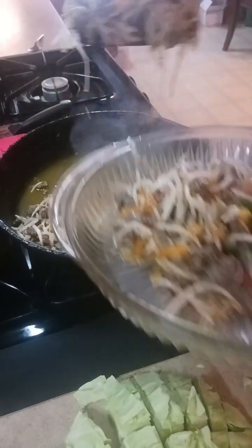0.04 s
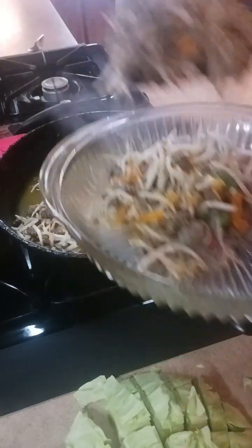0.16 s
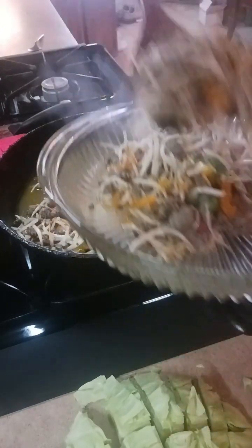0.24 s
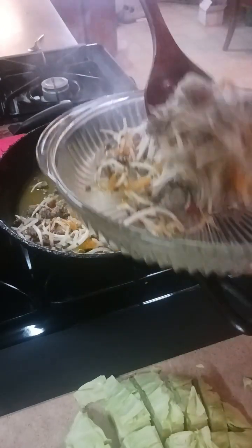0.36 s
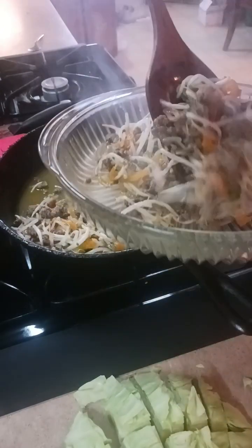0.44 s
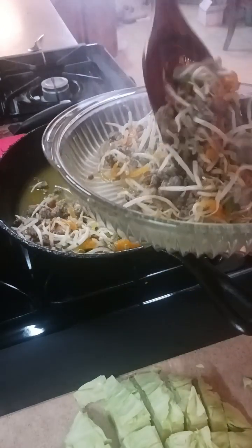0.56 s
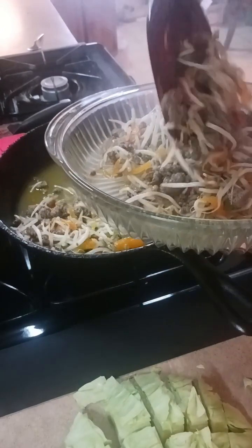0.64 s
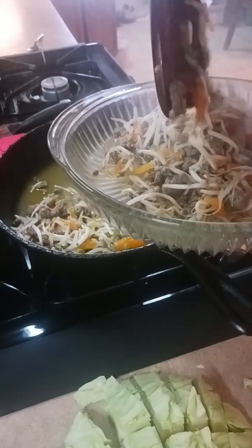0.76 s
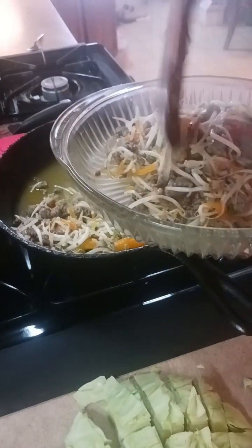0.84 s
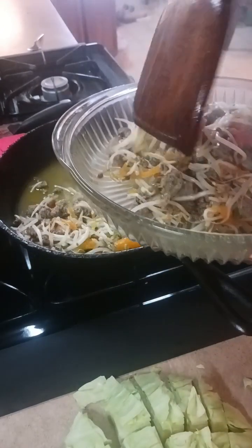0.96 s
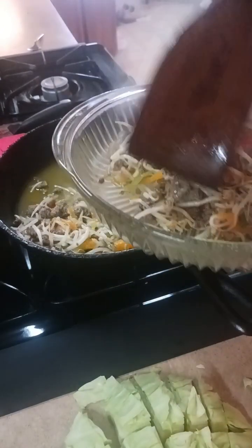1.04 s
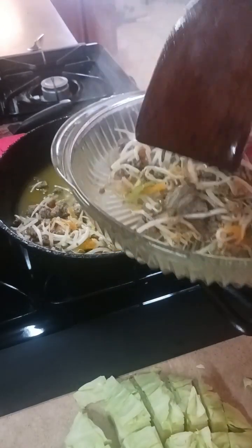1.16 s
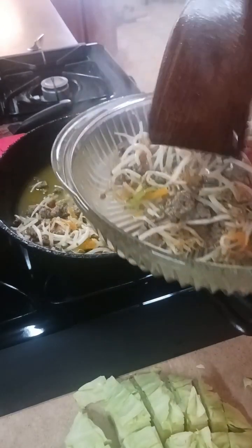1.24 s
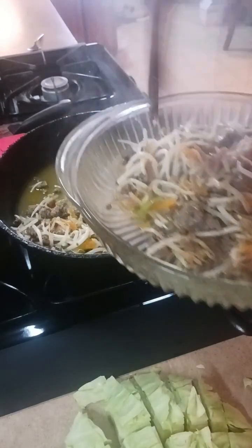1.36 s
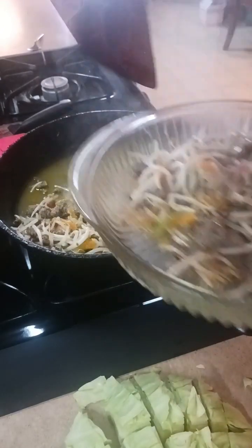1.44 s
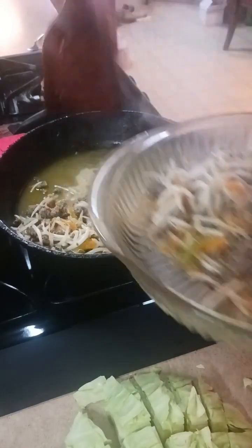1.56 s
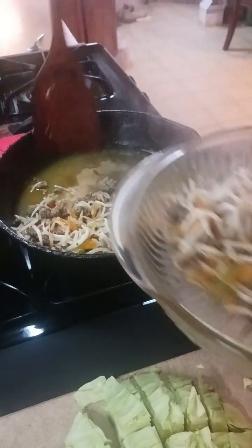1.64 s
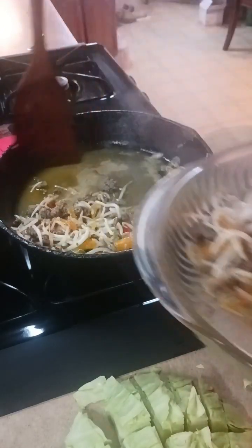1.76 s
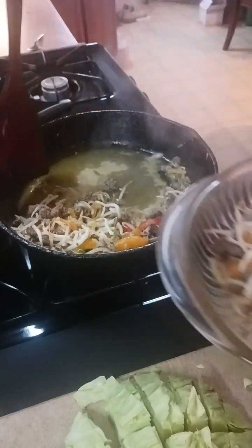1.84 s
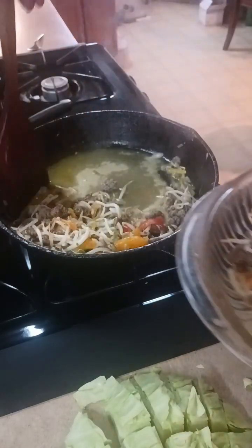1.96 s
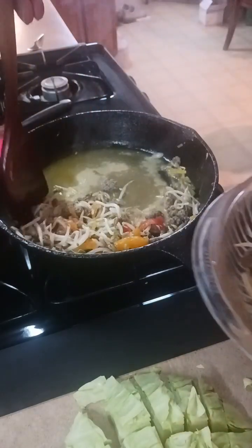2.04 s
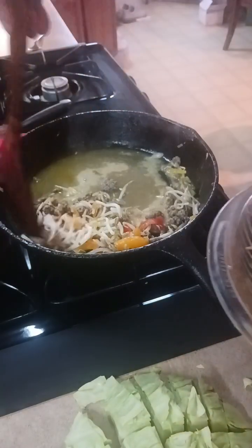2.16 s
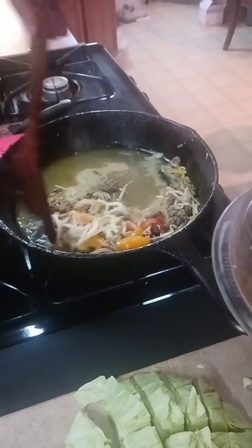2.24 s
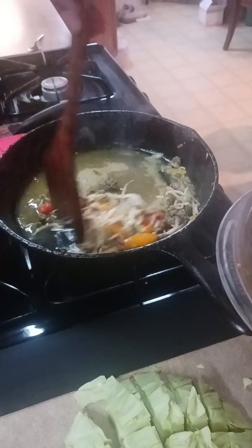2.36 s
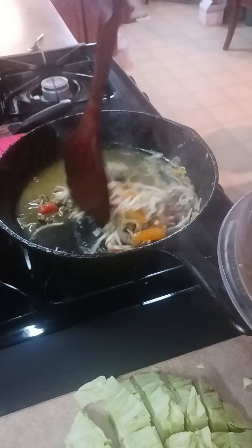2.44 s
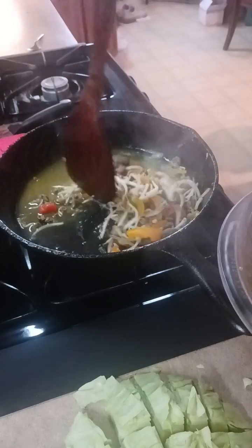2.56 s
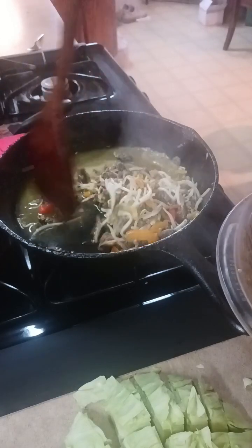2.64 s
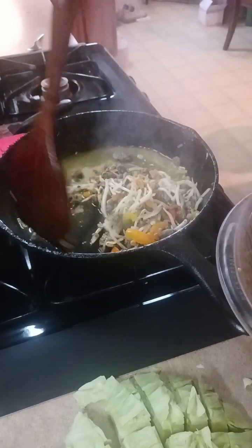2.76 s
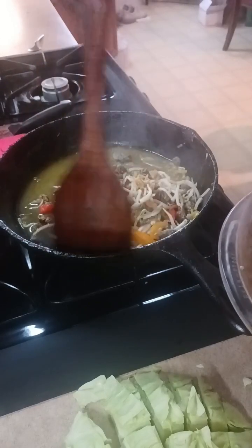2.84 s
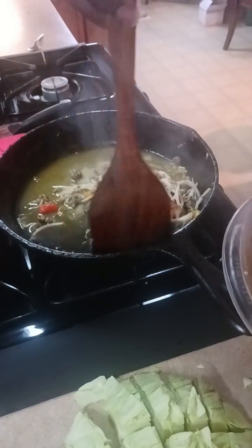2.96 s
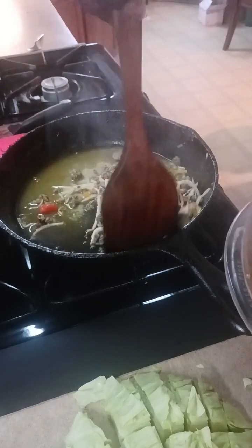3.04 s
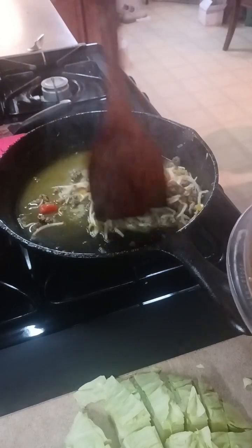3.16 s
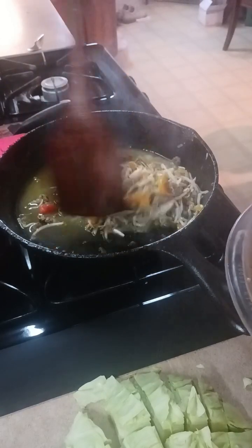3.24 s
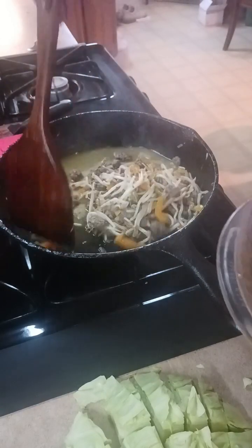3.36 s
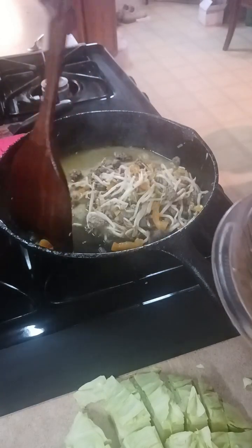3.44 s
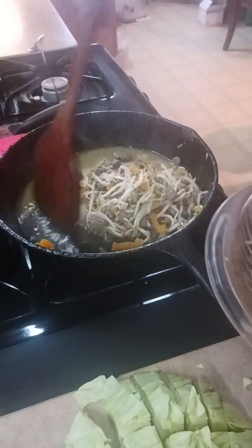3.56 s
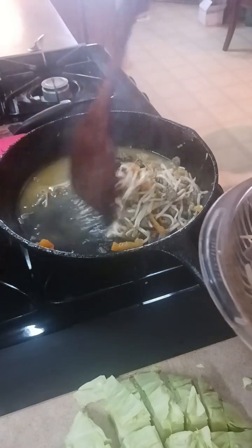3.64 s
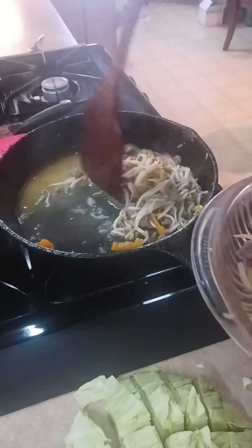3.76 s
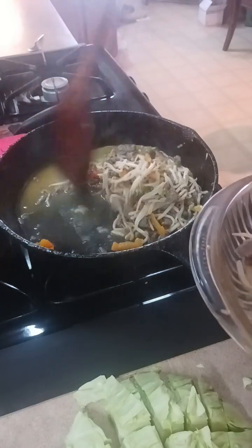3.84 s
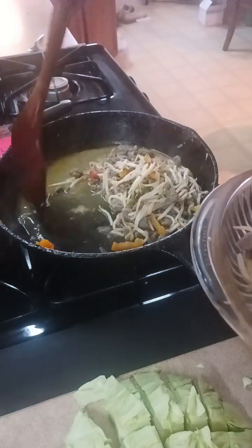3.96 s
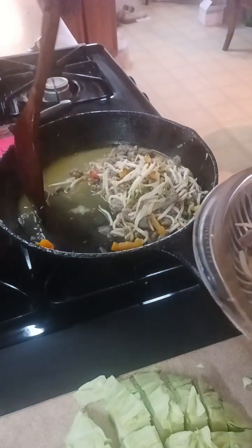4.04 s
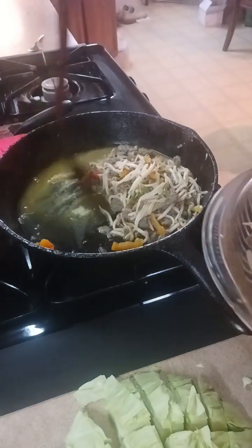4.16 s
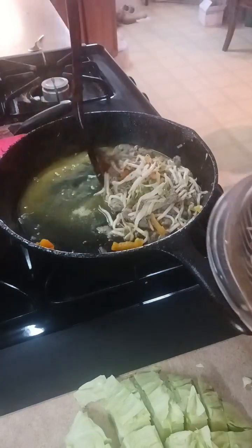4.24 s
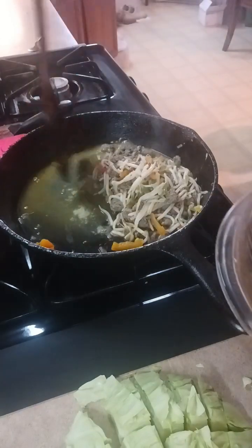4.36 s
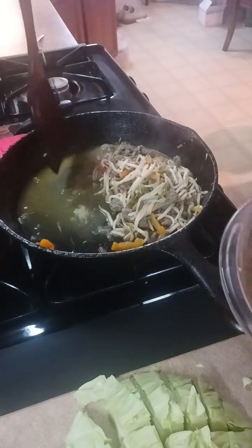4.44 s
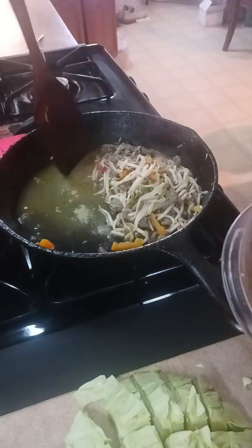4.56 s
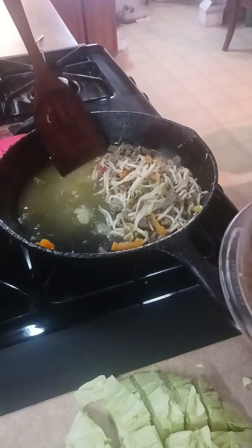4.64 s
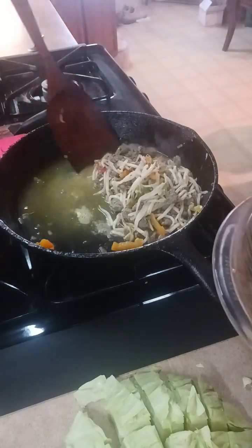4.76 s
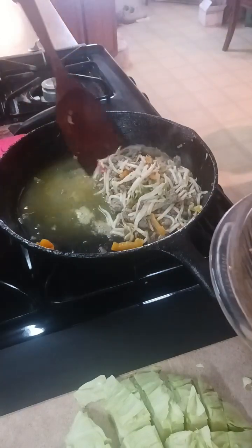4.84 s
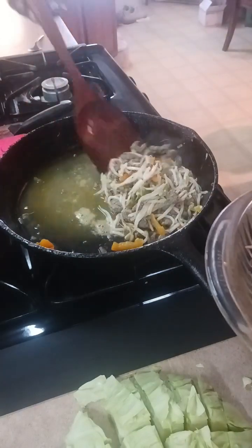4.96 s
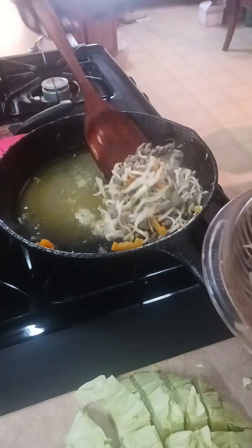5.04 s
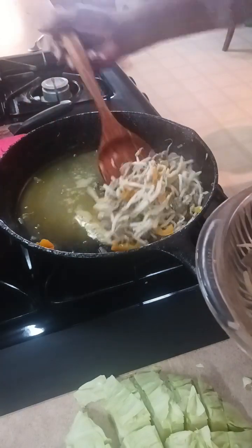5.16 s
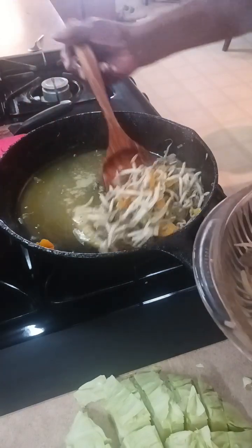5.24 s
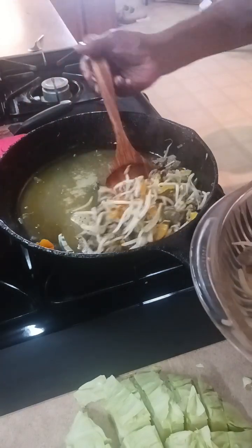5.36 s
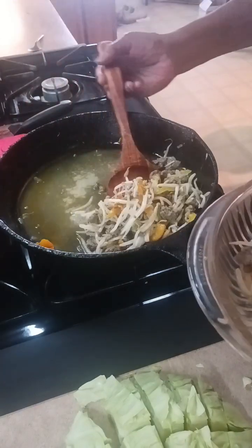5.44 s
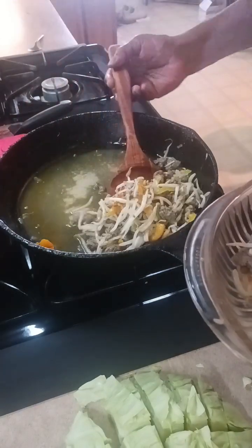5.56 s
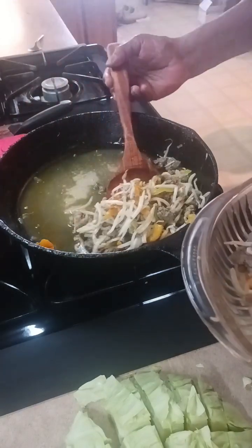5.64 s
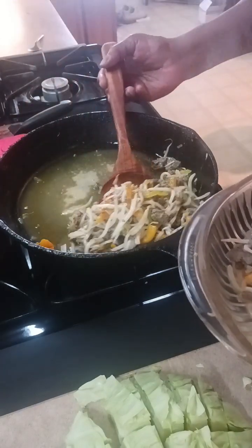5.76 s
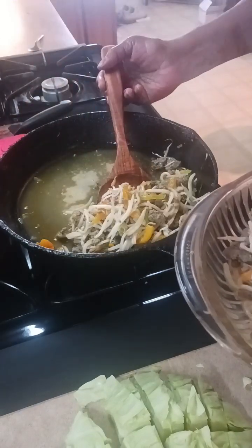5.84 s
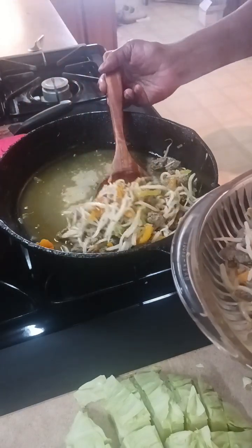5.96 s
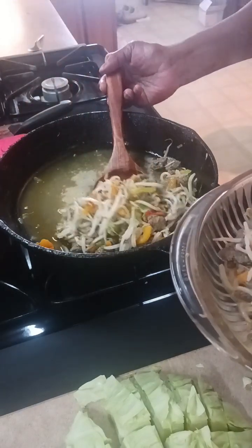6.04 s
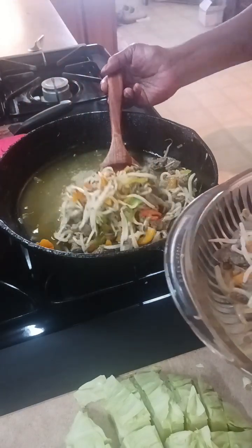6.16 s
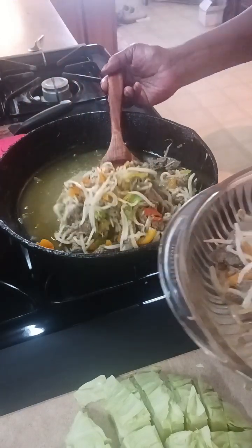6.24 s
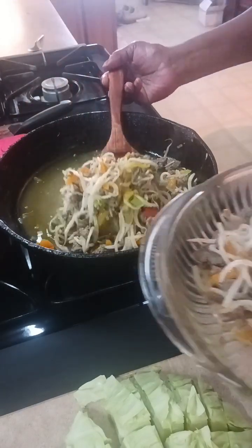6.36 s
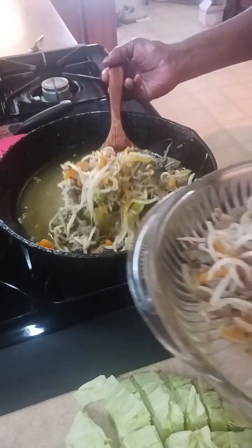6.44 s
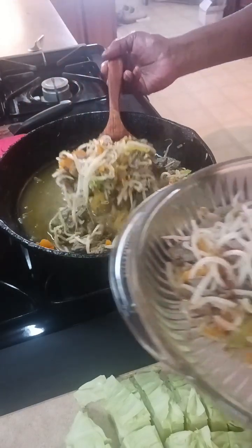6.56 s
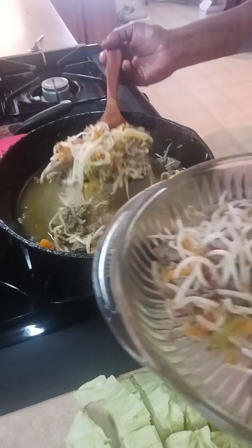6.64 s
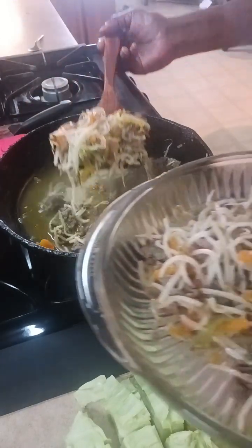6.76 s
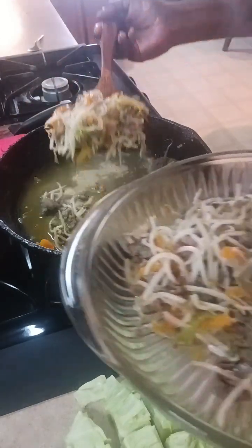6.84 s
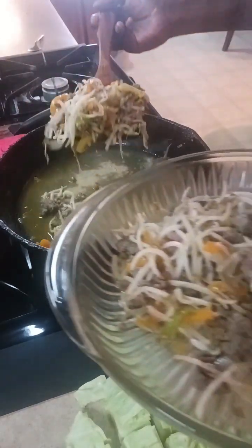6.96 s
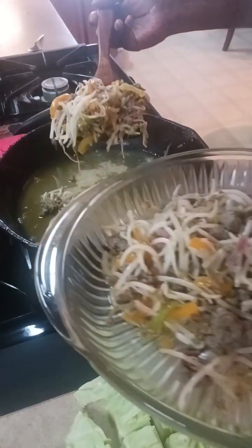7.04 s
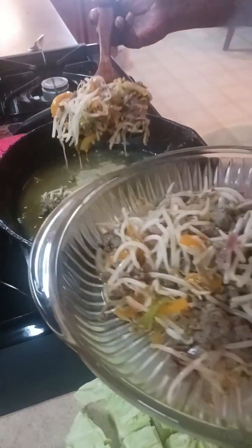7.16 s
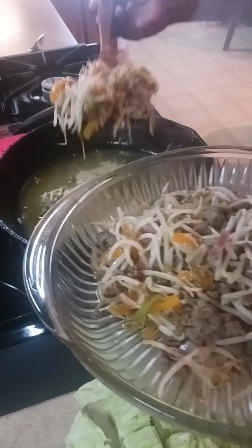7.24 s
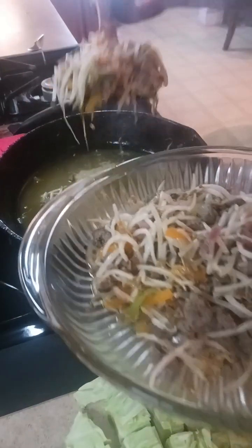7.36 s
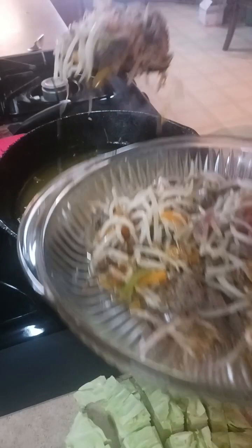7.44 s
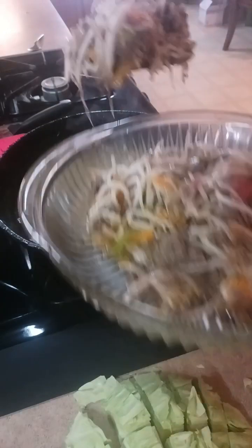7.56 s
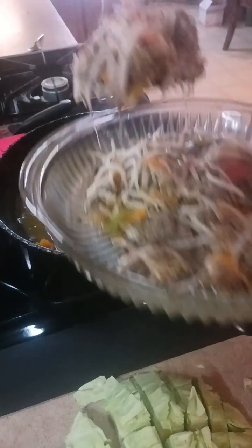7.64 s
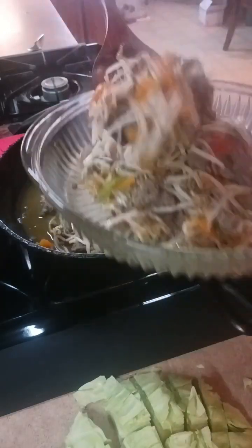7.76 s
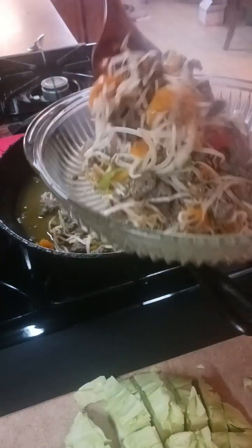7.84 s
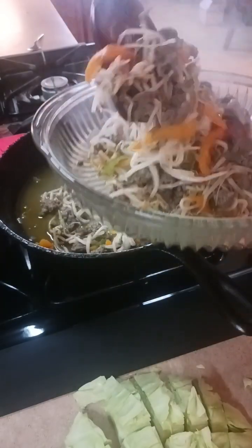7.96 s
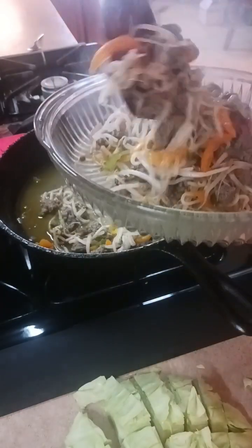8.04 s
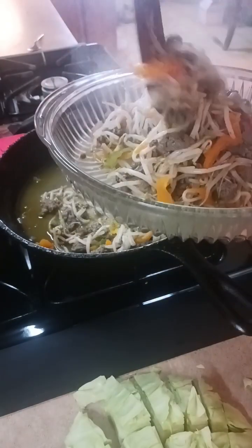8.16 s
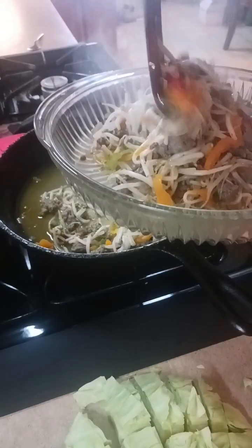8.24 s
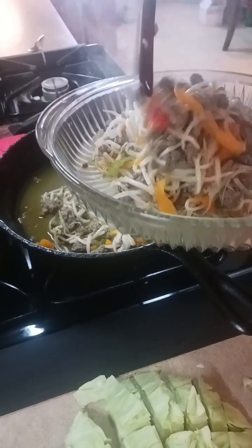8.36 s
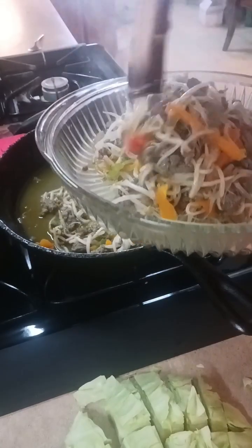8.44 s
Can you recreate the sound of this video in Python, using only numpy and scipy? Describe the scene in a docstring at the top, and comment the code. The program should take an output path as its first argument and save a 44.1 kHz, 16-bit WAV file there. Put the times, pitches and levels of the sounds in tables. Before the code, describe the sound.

Close stereo pickup in a home kitchen. A soft, steady sizzle and low rumble run throughout. After nearly two seconds a wooden spoon taps a heavy iron pan, then cracks it harder, scraping through wet vegetables. More bright knocks and short rasping strokes follow, the strongest a quick double midway. Tiny wet squeaks trail off, leaving faint sizzle and one barely audible tick late on.

```python
"""A wooden spoon knocks on and scrapes along a cast-iron pan of wet vegetables in a home kitchen.
Knocks and scrapes drive decaying modes of spoon, damped pan and iron; knocks add a crash of noise.
Wet bubbles and squeaks of the spoon on iron are short gliding tones; a low rumble and a faint smooth
sizzle, both filtered noise, lie below. Two microphone ports a few centimetres apart pick it up."""
import sys
import numpy as np
from scipy import signal
from scipy.fft import rfft, irfft, next_fast_len
from scipy.io import wavfile
from scipy.ndimage import uniform_filter1d

SR = 44100
rng = np.random.default_rng(int(sys.argv[2]) if len(sys.argv) > 2 else 0)


def transcribe(signal):
    """Save signal, clipped to [-1, 1], as a 16-bit WAV file at the path in sys.argv[1]."""
    frames = np.atleast_2d(signal).T
    limited = np.clip(frames, -1, 1)
    pcm = np.round(limited * 32767).astype(np.int16)
    wavfile.write(sys.argv[1], SR, pcm)


N = 374409

# Scraping strokes. Each row: start in s, rise in s, fall in s, top level in dB, starting colour in Hz,
# colour width in octaves, grit in dB.
STROKES = [(1.867, .012, 0.32, -44, 1200, 1.8, -18), (2.1, 0.059, .03, -55, 1700, 0.41, -4),
           (2.19, 0.018, 0.31, -41, 1690, 2, -13), (2.371, 0.038, 0.15, -43, 900, 0.66, -9),
           (2.804, 0.01, 0.22, -45, 1550, 2.9, 4), (2.89, 0.031, 0.21, -47.5, 1590, 0.93, -1),
           (3.348, 0.019, 0.15, -29, 2100, 1.46, -1), (3.41, 0.046, 0.062, -34, 1250, 1.5, -11),
           (3.501, 0.077, 0.21, -41.5, 980, .55, -5.5), (4.055, 0.013, 0.066, -34.5, 1170, 0.75, -33),
           (4.12, .066, .14, -35, 1050, 0.47, -13.5), (4.478, .02, 0.19, -34, 2200, 2, -10),
           (4.594, .012, 0.14, -28.5, 1670, 0.88, -31), (4.639, 0.029, 0.049, -31, 1100, 0.66, -19),
           (4.7, 0.093, .33, -44.5, 810, 0.84, -5), (4.88, 0.22, 0.35, -50, 1900, 0.58, 3.5)]
# Short modes of spoon and food-damped pan. Each row: frequency in Hz, level in dB, t60 in s before damping.
SHORT_MODES = [(310, -3, .25), (450, -3, .2), (600, -6, .08), (700, -5, .08), (800, -4, .09),
               (990, -4, .07), (1280, -5, .07), (1440, -3, .08), (1620, -.5, .14), (1850, -3, .13),
               (1955, -.5, .1), (2170, -.4, .075), (2620, -2.5, .045), (2920, -3.5, .045), (3340, -3, .06),
               (3600, -4, .07), (3990, -2.5, .07), (4150, -.5, .06), (4550, -6, .04), (5780, -7, .04),
               (6820, -18, .025), (8900, -22, .015)]
# Long modes of the iron. Each row: frequency in Hz, level in dB, t60 in s.
IRON_MODES = [(455, -13, .9), (721, -7, 1.2), (808, -20, .5), (1111, -2, .5), (1626, -17, .5),
              (1852, -18, .4), (2170, -1, .26), (2302, -15, .5), (2458, -14, .7), (2966, -24, .4),
              (3338, -23, .4), (3835, -18, .4), (4140, -14, .25), (4264, -19, .35), (4495, -14, .2),
              (5778, -14, .2)]


def from_db(db):
    """Decibels to gain."""
    return 10 ** (np.asarray(db) / 20)


def rms_one(x):
    """Scale to unit rms."""
    return x / np.sqrt(np.mean(x ** 2) + 1e-20)


def in_time(rows):
    """Columns of a curve, one value a sample."""
    s, *columns = np.transpose(rows)
    return [np.interp(np.arange(N) / SR, s, c) for c in columns]


def at_hz(points, hz):
    """Read a table on a log-frequency axis."""
    table_hz, values = np.array(points).T
    return np.interp(np.log(hz), np.log(table_hz), values)


def band_filter(order, low_hz, high_hz):
    """Butterworth band-pass sections."""
    return signal.butter(order, [low_hz, high_hz], "band", fs=SR, output="sos")


def drift(rate_hz):
    """Slow random wander with rms 1, drawn every 40 samples and interpolated."""
    r = np.exp(-80 * np.pi * rate_hz / SR)
    white = rng.standard_normal(N // 40 + 2002)
    slow = signal.lfilter([1], [1, -2 * r, r * r], white)[2000:]   # skips the filter's start
    return np.interp(np.arange(N) / 40, np.arange(len(slow)), rms_one(slow))


def ring(force, hz, t60_s):
    """Decaying mode: a unit click starts a sine of initial amplitude 1."""
    r = from_db(-60 / (t60_s * SR))
    w = 2 * np.pi * hz / SR
    return signal.lfilter([0, np.sin(w)], [1, -2 * r * np.cos(w), r * r], force + 1e-18)


def stereo_pair(mid, side, hz):
    """Mix two noises to the left-right likeness and level difference at this frequency."""
    # Each row: frequency in Hz, left-right correlation.
    likeness = [(60, 0.94), (130, 0.92), (290, 0.65), (640, 0.52), (1410, -0.069), (3100, -0.1),
                (6820, -0.084), (15000, 0.072)]
    # Each row: frequency in Hz, left minus right in dB.
    leaning = [(60, 2), (110, -6), (200, 10.5), (380, 6.5), (700, -0.5), (1290, 5.5), (2380, 2.5),
               (4400, 2.5), (8120, -3), (15000, 4.5)]
    alike = np.clip(at_hz(likeness, hz), -1, 1)
    half_lean_db = at_hz(leaning, hz) / 2
    pair = np.sqrt(1 + alike) * mid + np.sqrt(1 - alike) * side * [[1], [-1]]
    return pair * from_db([[half_lean_db], [-half_lean_db]])


def rumble():
    """Low noise that rings in a few resonances of room and stove, each wandering in level."""
    # Each row: frequency in Hz, width in Hz, relative level in dB.
    resonances = [(58.5, 6.9, 1), (110.9, 11.9, 0.5), (172, 10, -28), (275, 8, -18.5), (324, 10, -28),
                  (433, 25, -12)]
    out = 0
    for hz, width_hz, level_db in resonances:
        r = np.exp(-np.pi * width_hz / SR)
        poles = [1, -2 * r * np.cos(2 * np.pi * hz / SR), r * r]
        white = rng.standard_normal((2, N + 9000))
        mid, side = signal.lfilter([1, 0, -1], poles, white)[:, 9000:]
        gain = from_db(level_db + 1.4 * drift(11.0))
        out = out + gain * stereo_pair(rms_one(mid), rms_one(side), hz)
    return rms_one(signal.sosfilt(band_filter(2, 38, 520), out))


def sizzle(spectrum, patchy_db):
    """Bursts too dense to tell apart, made as noise in quarter-octave bands that flicker a little."""
    out, together = 0, drift(27.0)
    first_hz, last_hz = spectrum[0][0], spectrum[-1][0]
    edges_hz = first_hz * 2 ** np.arange(0, np.log2(last_hz / first_hz) + .1, .25)
    white = rng.standard_normal((2, 2, N))   # neighbouring bands use different noise
    for k, (low_hz, high_hz) in enumerate(zip(edges_hz, np.minimum(edges_hz[1:], .45 * SR))):
        mid, side = signal.sosfilt(band_filter(2, low_hz, high_hz), white[k % 2])
        hz = np.sqrt(low_hz * high_hz)
        flicker_db = patchy_db * (0.21 * together + drift(9.3))
        out = out + from_db(at_hz(spectrum, hz) + flicker_db) * stereo_pair(mid, side, hz)
    return rms_one(out)


def hump(hz, centre_hz, octaves):
    """Bell curve on a log-frequency axis."""
    return np.exp(-.5 * (np.log2(hz / centre_hz) / np.maximum(octaves, .12)) ** 2)


def colour(hz, centre_hz, octaves, edge_db, edge_hz, thump_db, ping_db):
    """How strongly a contact drives hz: humps for body, hard edge, low thump and top ping, plus a floor."""
    body = hump(hz, centre_hz, octaves)
    edge = from_db(edge_db) * hump(hz, edge_hz, .2)
    thump = from_db(thump_db) * hump(hz, 410, 0.4)
    ping = from_db(ping_db) * hump(hz, 5850, .1)
    return body + edge + thump + ping + 0.0033


def crash(contact, treble_db, decay_share):
    """Countless high modes merge into noise, separate in each port, that dies band by band."""
    # Each row: band centre in Hz, level in dB, t60 in s before decay_share.
    bands = [(500, -6, .3), (1000, -3, .3), (2000, -.3, .28), (4000, -.3, .26), (8000, -3, .24),
             (13000, -9, .16)]
    t = np.arange(int(.3 * SR)) / SR
    hz = np.maximum(np.fft.rfftfreq(len(t), 1 / SR), 1)
    tint = colour(hz, *contact) ** .8 + from_db(treble_db) * hump(hz, 8000, .8)
    white = rfft(rng.standard_normal((2, len(t)))) * tint
    noise = 0
    for band_hz, db, t60_s in bands:
        decay = from_db(db - 60 * t / (t60_s * decay_share))
        noise = noise + decay * irfft(white * hump(hz, band_hz, 0.63), len(t))
    return (1 - np.exp(-t / 0.00018)) * noise


def knocks():
    """A brief push drives short modes by its colour and the iron's long ring; a crash of noise joins."""
    # Each row: start in s, level in dB, strike colour in Hz, colour width in octaves, hard edge in dB,
    # edge in Hz, low thump in dB, top ping in dB, iron ring in dB, factor on short-mode t60,
    # left minus right in dB.
    hits = [(1.858, -29.5, 1240, 0.47, -1, 4160, 2, -35, -23, 0.53, -2),
            (2.181, -9.5, 2365, 0.15, -9.5, 4360, -31.5, -35, -24.5, 0.3, -2),
            (2.803, -29, 1530, 0.14, 2, 3040, -7, -30, -35, 0.42, 0),
            (2.965, -37.5, 1550, .27, 16, 2870, -23, -17, -32, 0.5, -2),
            (3.3404, -9.5, 2200, 0.6, 10.5, 4170, -20, -6, -13.5, 0.42, -0.5),
            (3.449, -27, 1130, 0.2, -16, 2900, -13.5, -33, -15, .8, -1),
            (4.024, -23.5, 2210, 0.17, -8, 4160, -24.5, -38, -27.5, 0.69, 2),
            (4.047, -16.5, 1270, 0.45, -8.5, 3300, -20.5, -40, -30.5, 0.55, -4.5),
            (4.4685, -10, 2310, 0.51, 6, 4000, -18, 6.5, -14, 0.34, 5),
            (4.5869, -5.5, 1820, 0.14, -2.5, 3410, -30, -10.5, -32.5, 0.61, 3),
            (4.775, -41, 700, 0.41, 2, 3200, -19, -30, -22, .68, -9),
            (6.18, -51.5, 715, .2, 11, 4200, 8, -29, -9, .99, 7),
            (7.5401, -32.5, 3200, 0.26, 4, 4700, -32, -5, -25, 0.28, -3)]
    contact_ms_at_0_db, shortening_db_per_edge_db = .05, .3   # a harder edge touches more briefly
    crash_db, treble_under_edge_db, crash_decay_share = -13, -13, 0.32
    out, t = np.zeros((2, N)), np.arange(int(.7 * SR)) / SR
    radiate = signal.butter(2, 290, "high", fs=SR, output="sos")   # a small body pushes little air in the bass
    lucks = from_db(rng.normal(0, 1.5, (len(hits), 40)))   # random gain per mode
    for row, luck in zip(hits, lucks):
        s, level_db, *contact, iron_db, damping, pan_db = row
        edge_db = contact[2]
        contact_ms = contact_ms_at_0_db * from_db(-shortening_db_per_edge_db * edge_db)
        push = np.exp(-.5 * (4000 * t / max(contact_ms, .03) - 2.5) ** 2)
        push /= push.sum()
        short_push = push[:int(.3 * SR)]

        thud = 0
        for k, (hz, db, t60_s) in enumerate(SHORT_MODES):
            gain = (-1) ** (k // 3) * from_db(db) * colour(hz, *contact) * luck[k]
            thud = thud + gain * ring(short_push, hz, t60_s * max(damping, .1))
        thud = signal.sosfilt(radiate, thud)
        thud = thud / np.sqrt(5 * np.mean(thud[:250] ** 2))   # level set by the first 250 samples

        iron = 0
        for k, (hz, db, t60_s) in enumerate(IRON_MODES):
            gain = (-1) ** (k // 2) * from_db(db) * colour(hz, *contact) ** .5 * luck[-1 - k]
            iron = iron + gain * ring(push, hz, t60_s)

        sound = from_db(iron_db) * iron * np.ones((2, 1))
        burst = crash(contact, edge_db + treble_under_edge_db, crash_decay_share)
        sound[:, :len(short_push)] += thud + from_db(crash_db) * burst
        at = round(s * SR)
        panned = sound[:, :N - at] * from_db([[pan_db / 2], [-pan_db / 2]])
        out[:, at:at + len(t)] += from_db(level_db) * panned
    return out


def stroke_db(start_s, rise_s, fall_s, top_db):
    """Sample indices of one stroke and its level: swell, then fade, linear in dB."""
    swell_db, fade_db = 12, 26.5
    at = np.arange(round(start_s * SR), round((start_s + rise_s + fall_s) * SR))
    levels_db = [top_db - swell_db, top_db, top_db - fade_db]
    return at, np.interp(at / SR - start_s, [0, rise_s, rise_s + fall_s], levels_db)


def scraping(slips_per_s, iron_db, apart):
    """The blade stutters over rough iron: dense uneven slips drive the modes, partly unlike at the ports."""
    sag_octaves_per_s = .9   # the colour darkens as the blade slows
    out = np.zeros((2, N))
    modes = [(hz, db, 0.39 * t60_s) for hz, db, t60_s in SHORT_MODES]
    modes += [(hz, db + iron_db, t60_s) for hz, db, t60_s in IRON_MODES]
    for *shape, start_hz, octaves, grit_db in STROKES:
        at, level_db = stroke_db(*shape)
        centre_hz = start_hz * 2 ** (-sag_octaves_per_s * (at - at[0]) / SR)
        slip_db = 1.8 * np.minimum(rng.exponential(1, len(at)), 4)
        slips = (rng.random(len(at)) < slips_per_s / SR) * from_db(slip_db)
        common = rng.standard_normal(len(at))
        force = slips * (common + apart * rng.standard_normal((2, len(at))))
        sound = 0
        for k, (hz, db, t60_s) in enumerate(modes):
            drive = from_db(db) * colour(hz, centre_hz, octaves, grit_db, 2980, -22.5, -33.5)
            sound = sound + (-1) ** k * ring(force * drive, hz, t60_s)
        rasp = signal.sosfilt(band_filter(2, 4500, 12000), force)   # the slips heard directly
        sound = sound + from_db(grit_db + 14) * rasp
        # flattened, so that the stroke's shape sets the level
        loudness = np.sqrt(uniform_filter1d((sound ** 2).mean(axis=0), size=3000) + 1e-12)
        out[:, at] += sound / loudness * from_db(level_db) * signal.windows.tukey(len(at), .1)
    return out


def stirring():
    """Stirred food sizzles harder and the pan shakes while the blade moves: a smoothed control signal."""
    level_share, smooth_s = 0.53, 0.037   # share of the stroke's level in dB
    moved = np.zeros(N)
    for row in STROKES:
        at, level_db = stroke_db(*row[:4])
        moved[at] = np.maximum(moved[at], from_db(level_share * level_db))
    return np.maximum(uniform_filter1d(moved, size=int(smooth_s * SR)), 0)


def chirps():
    """Short gliding tones with one overtone: wet bubbles and squeaks of the spoon on iron."""
    # Each row: start in s, level in dB, start in Hz, end in Hz, length in s, overtone in dB,
    # left minus right in dB.
    glides = [(4.663, -32.5, 940, 1085, 0.019, -27, -14), (4.728, -33.5, 923, 1035, 0.012, -32.5, -5),
              (4.974, -50, 1710, 1850, .018, -32, 3), (5.002, -42.5, 2060, 2230, 0.023, -18, -3),
              (5.027, -48, 1217, 1490, 0.071, -19, 6), (5.082, -56, 1496, 1720, 0.072, 8, 2),
              (5.09, -52, 2120, 2300, .04, -5, 6), (5.157, -57, 1364, 1173, 0.193, -29, 0)]
    out = np.zeros((2, N))
    for s, level_db, start_hz, end_hz, length_s, overtone_db, pan_db in glides:
        u = np.linspace(0, 1, int(length_s * SR))
        phase = 2 * np.pi * np.cumsum(start_hz + (end_hz - start_hz) * u) / SR
        shape = np.sin(np.pi * u ** 0.6) ** 1.3
        wave = np.sin(phase) + from_db(overtone_db) * np.sin(2 * phase)
        tone = from_db(level_db) * shape * wave
        at = round(s * SR)
        out[:, at:at + len(u)] += tone * from_db([[pan_db / 2], [-pan_db / 2]])
    return out


def ports(x):
    """The two ports hear the pan with level and phase differing by frequency, and own near echoes."""
    # Each row: frequency in Hz, left minus right in dB.
    pan_leaning = [(60, -1.0), (110, -4.0), (200, -3.5), (380, 1.0), (700, -6.5), (1290, -0.5), (2380, 2.5),
                   (4400, 5.0), (8120, -1.0), (15000, 1.5)]
    # Each row: frequency in Hz, phase by which left leads in radians.
    pan_phase = [(100, .05), (600, .6), (1100, 2.2), (1700, 1.4), (2500, 1.9), (4200, 2.7), (8000, 5.5),
                 (16000, 11.)]
    # Echoes off the stove, one list for the left port, one for the right. Each row: delay in s, level in dB.
    stove_echoes = [
        [(.0021, -34), (.0074, -34.5)],
        [(.0033, -6), (.0078, -14.5)],
    ]
    size = next_fast_len(N + 4096)
    hz = np.maximum(np.fft.rfftfreq(size, 1 / SR), 1)
    lean = from_db(at_hz(pan_leaning, hz) / 2)
    right_lag = np.exp(-1j * at_hz(pan_phase, hz))
    paths = []
    for port_echoes in stove_echoes:
        echoes = sum(from_db(db) * np.exp(-2j * np.pi * hz * s) for s, db in port_echoes)
        paths.append(1 + echoes)
    return irfft(rfft(x, size) * paths * [lean, right_lag / lean], size)[:, :N]


def kitchen(x):
    """Room reverberation: eight feedback delays a side, duller on every round."""
    bass_t60_s, wall_cut_hz = 0.49, 2400
    size = next_fast_len(N + SR)
    w = 2 * np.pi * np.fft.rfftfreq(size)
    dull = 1 / (1 + 1j * w * SR / (2 * np.pi * wall_cut_hz))
    response = np.zeros((2, len(w)), complex)
    for k, lag in enumerate(np.geomspace(.006, .037, 16) * SR):
        loop = from_db(-60 * lag / SR / bass_t60_s) * dull * np.exp(-1j * w * round(lag))
        response[k % 2] += loop / (1 - loop) * (-1) ** (k // 2)
    return irfft(response * rfft(x, size), size)[:, :N]


def scene():
    """Pan sounds through ports and room, over the background."""
    # Background between the strokes. Each row: time in s, rumble in dB, upper sizzle in dB.
    background_levels = [(0.0, -49, -59), (0.16, -48, -58.5), (1.32, -52.5, -58), (2.22, -48, -55),
                         (2.62, -50, -58.5), (3.33, -48, -58), (3.5, -52, -57.5), (3.66, -59, -61.5),
                         (4.11, -47.5, -55), (4.45, -57.5, -60.5), (4.68, -46.5, -57.5),
                         (5.51, -54.5, -63.5), (6.24, -52, -60), (7.52, -49.5, -58), (7.97, -51.5, -58),
                         (8.49, -51, -57)]
    # Each row: frequency in Hz, relative density in dB per Hz.
    lower_spectrum = [(260, -40.5), (450, -4), (586, -20), (635, -7), (746, -12.5), (994, -8), (1610, -6.5),
                      (1740, -5), (2030, -7), (2860, -3), (3060, -5), (3990, -3), (7000, -13.5),
                      (9100, -39), (15400, -120)]
    # Each row: frequency in Hz, relative density in dB per Hz.
    upper_spectrum = [(2940, -20), (5000, -14.5), (6470, -3), (7420, 2), (8250, -4), (11700, 2),
                      (14900, -1), (15700, -4.5), (16000, -11)]
    lower_above_upper_db, kitchen_db = 2.5, -17.5
    stir_rumble_db, stir_lower_db, stir_upper_db = -26, -29, -36   # added where stirring() is 1
    rumble_db, sizzle_db = in_time(background_levels)
    stir = stirring()

    rumble_gain = np.hypot(from_db(rumble_db), from_db(stir_rumble_db) * stir)
    lower_gain = np.hypot(from_db(sizzle_db + lower_above_upper_db), from_db(stir_lower_db) * stir)
    upper_gain = np.hypot(from_db(sizzle_db), from_db(stir_upper_db) * stir)
    background = rumble_gain * rumble()
    background += lower_gain * sizzle(lower_spectrum, patchy_db=1.07)
    background += upper_gain * sizzle(upper_spectrum, patchy_db=1.2)

    pan = knocks() + scraping(slips_per_s=1300, iron_db=-21.5, apart=0.43) + chirps()
    return ports(pan) + from_db(kitchen_db) * kitchen(pan.mean(axis=0)) + background


def record(dry):
    """The highest peaks are rounded, the top is cut steeply."""
    cutoff_hz = 15750
    rounded = dry / (1 + np.abs(dry) ** 4) ** .25
    return .97 * signal.sosfilt(signal.cheby2(16, 60, cutoff_hz, fs=SR, output="sos"), rounded)


dry = scene()
out = record(dry)
transcribe(out)
```